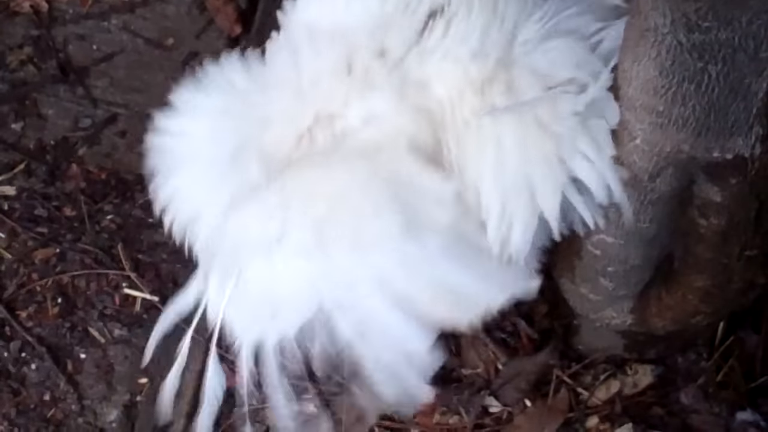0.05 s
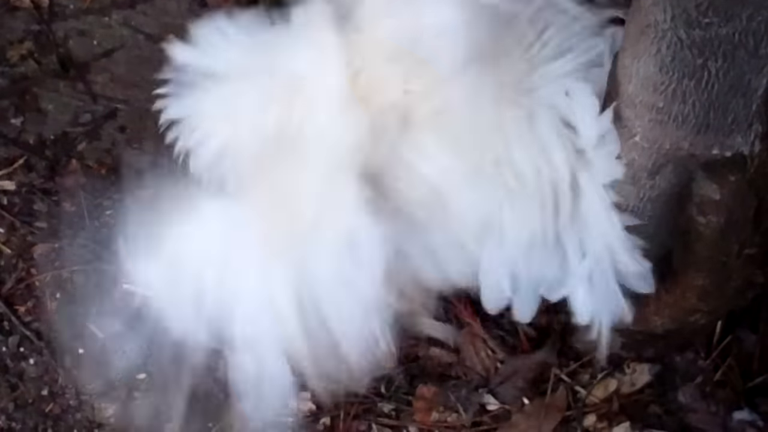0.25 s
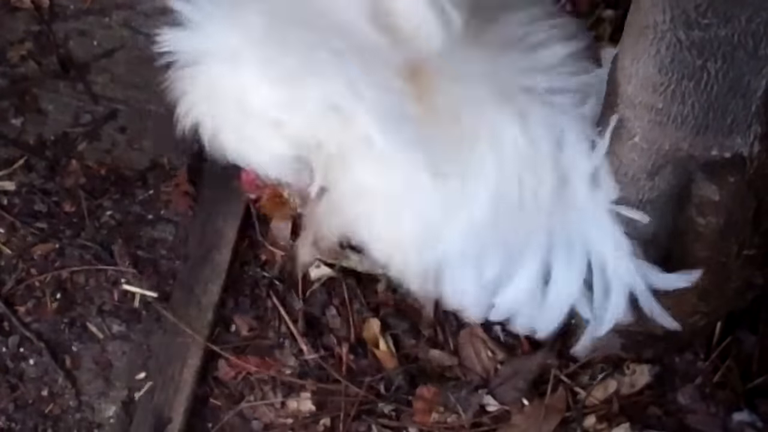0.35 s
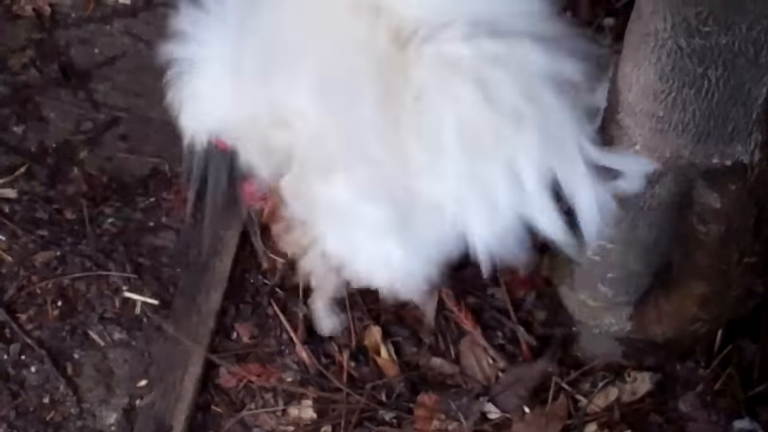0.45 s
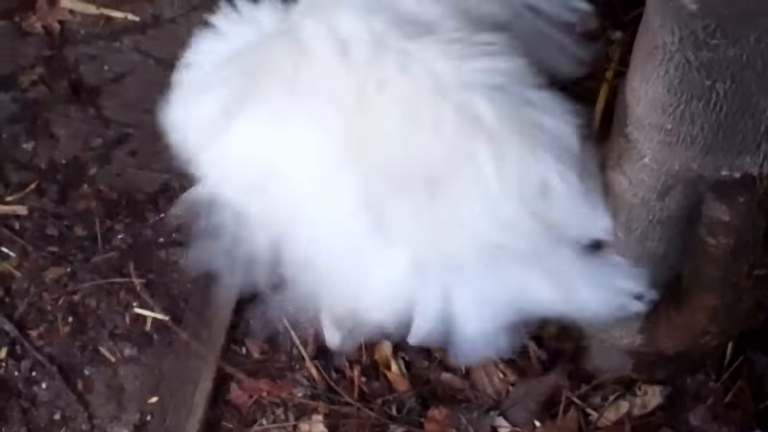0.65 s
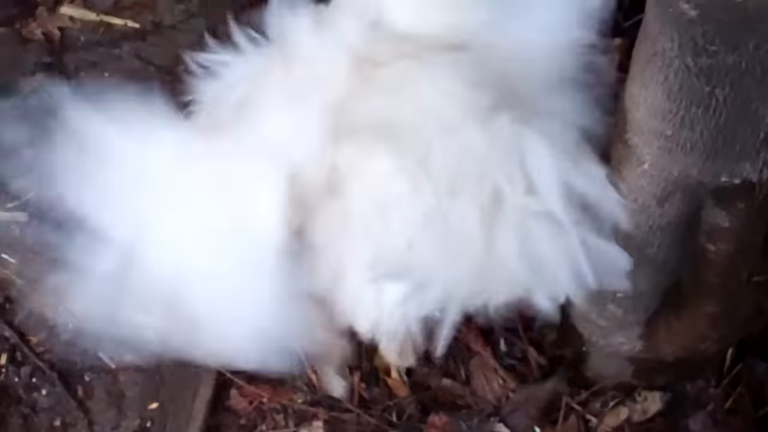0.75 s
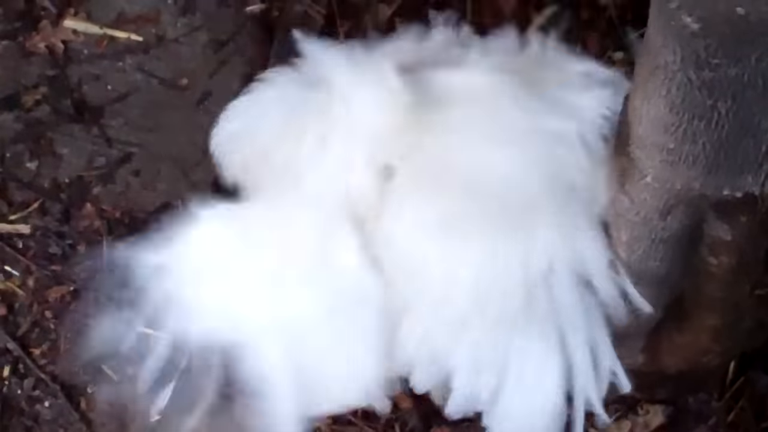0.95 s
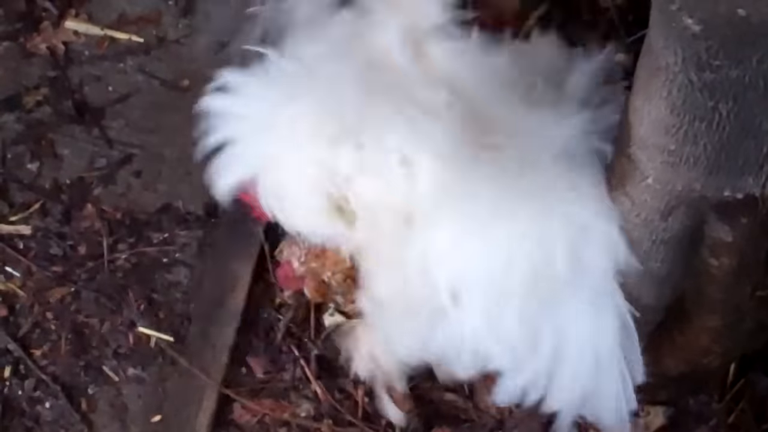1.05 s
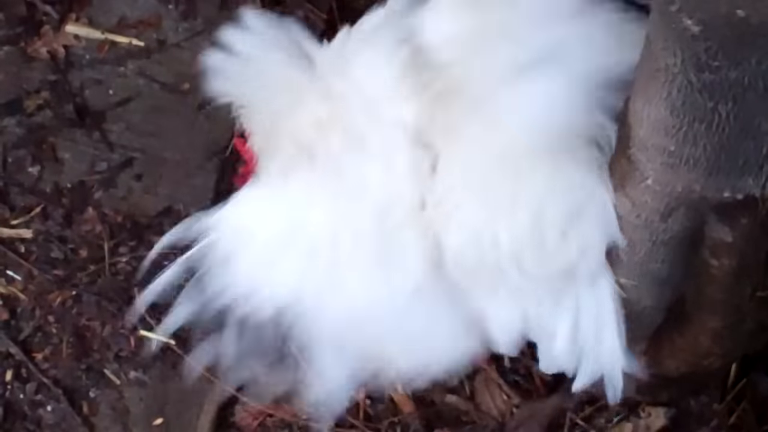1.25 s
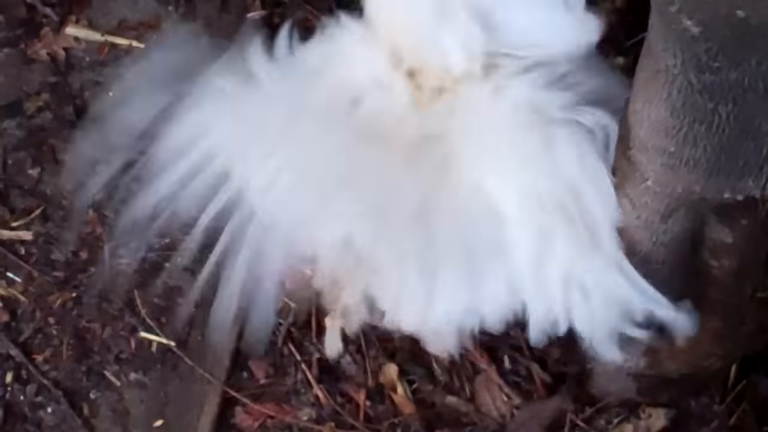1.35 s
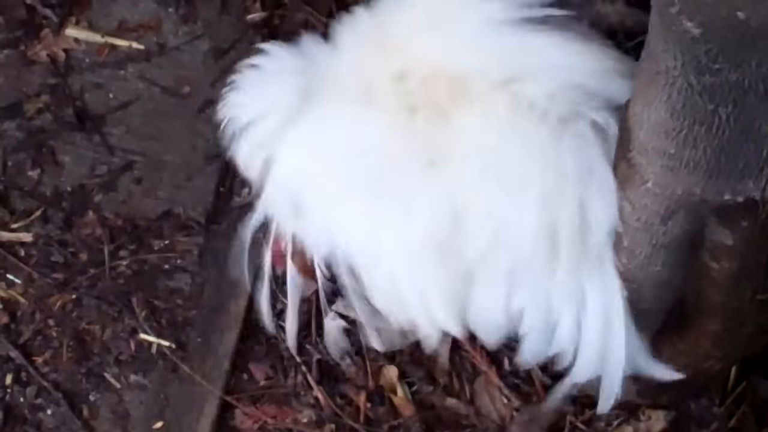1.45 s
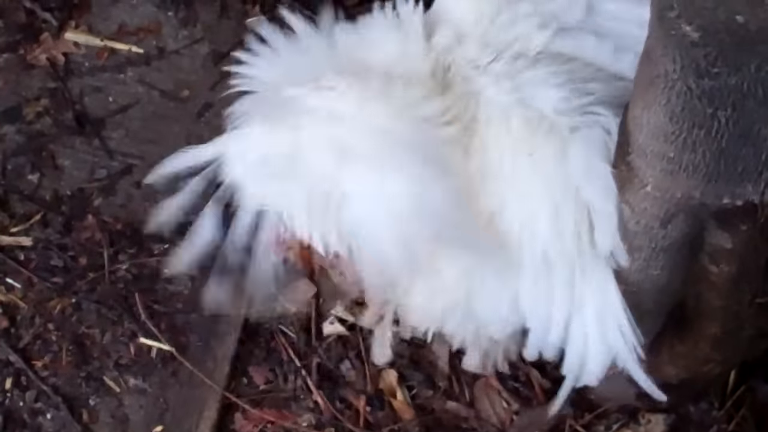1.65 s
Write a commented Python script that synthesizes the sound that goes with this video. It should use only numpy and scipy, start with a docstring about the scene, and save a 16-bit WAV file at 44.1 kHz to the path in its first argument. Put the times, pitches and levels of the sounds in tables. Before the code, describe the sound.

A hen flaps her wings in quick bursts, feathers rustling against leaves and bark.

```python
"""A quiet farmyard, microphone close to a hen beating her wings on leaf litter beside a tree trunk.
Each stroke pushes a soft whoosh of air; stiff feather tips scrape over bark and leaves,
and quills snap against them. Her plumage rustles in between, and a dull knock sounds at the very end.
The yard gives a faint echo; under it all lies a low hush with wide microphone hiss."""
import sys
import numpy as np
from scipy import signal
from scipy.fft import rfft, irfft, next_fast_len
from scipy.io import wavfile
from scipy.ndimage import map_coordinates

SR = 44100
rng = np.random.default_rng(int(sys.argv[2]) if len(sys.argv) > 2 else 0)


def put_to_file(sound):
    """Save the sound as 16-bit audio at rate SR, in the file named by the first command-line argument."""
    columns = np.atleast_2d(sound).T  # one column per channel
    safe = np.clip(columns, -1, 1)
    whole_steps = np.round(safe * 32767)
    wavfile.write(sys.argv[1], SR, whole_steps.astype(np.int16))


N = 74970

# spectra of the background, plumage, scraped bark, quill shaft, vane hiss and pushed air: f/Hz, level/dB
BACKGROUND_SPECTRUM = [(25, -5), (60, -4.5), (110, -0.5), (280, -3.5), (650, -0.5), (1100, 0.5),
                       (2000, -5.5), (5000, -8), (14000, -5)]
PLUMAGE_SPECTRUM = [(40, -15), (140, 6), (280, 6.5), (600, 3), (1400, -1), (3000, 1), (4500, 2), (7500, 1),
                    (10000, 1.5), (14000, 2.5)]
BARK_SPECTRUM = [(100, -37), (500, -6), (1500, -8.5), (3000, -1.5), (4400, -3.5), (6000, -1.5),
                 (7600, -4.5), (10000, 0.5), (13800, 0.5), (16000, -12)]
SHAFT_SPECTRUM = [(400, -28), (1500, -13), (2900, -5), (4000, -8.5), (5800, 1.5), (7600, -9)]
HISS_SPECTRUM = [(200, -24), (1000, -8.5), (2200, -4.5), (3200, -4), (4400, -3.5), (5800, -4.5),
                 (7500, -1.5), (10000, -2), (14000, 1)]
AIR_SPECTRUM = [(30, -22), (80, -15), (150, -3.5), (300, 2.5), (520, -2), (900, 0), (1400, -4), (2500, -5),
                (5000, -17), (14000, -30)]
# likeness of left and right in the background, low where microphone hiss rules: f/Hz, correlation/0-1
BACKGROUND_ALIKE = [(40, 0.83), (300, 0.31), (1100, 0.73), (2500, 0.041), (14000, .05)]
# likeness of left and right for the hen and her snaps: f/Hz, correlation/0-1
HEN_ALIKE = [(40, 1), (250, 0.99), (1000, 0.99), (3100, 1), (3700, 0.76), (7000, 0.16), (14000, 0.04)]
SNAP_ALIKE = [(3000, 0.84), (6000, 0.98), (14000, 1)]
# the hen's balance at the microphone: f/Hz, left over right/dB
HEN_BALANCE = [(2500, 0), (5500, 2.5), (8500, -2.3)]
# decay of the yard's echo: f/Hz, t60/s
ECHO_DECAY = [(200, 0.36), (2000, 0.25), (12000, 0.21)]
# modes of the knock: f/Hz, relative level/dB, t60/s
KNOCK_MODES = [(303, -4.5, 0.071), (510, -4.5, 0.09), (787, -0.5, 0.093), (1090, -3.5, 0.038)]
# rustle of the plumage: t/s, level/dB
RUSTLE_LEVELS = [(0, -56.5), (0.111, -60), (0.137, -47), (0.251, -41), (.31, -45.5), (.39, -43),
                 (.455, -46.5), (.5, -44.5), (.56, -42), (.66, -40.5), (.8, -43), (.93, -39), (1.07, -47),
                 (1.115, -48), (1.2, -45), (1.25, -51), (1.43, -49.5), (1.51, -46), (1.6, -48.5),
                 (1.67, -56.5)]
# feather tips on bark and leaves: start t/s, length/s, level/dB, treble tilt/dB per octave
TIP_SCRAPES = [(0.197, .001, -34, -2), (0.212, .012, -26, 2.5), (0.34, 0.019, -28.5, 5),
               (0.4804, 0.0018, -30, 0.5), (0.592, 0.016, -35, 0.5), (0.8333, 0.0048, -33.5, 1.5),
               (0.9132, 0.0058, -26.5, 1), (0.922, 0.0039, -25.5, 4), (0.927, 0.013, -34, 0),
               (1.005, 0.033, -34.5, 1.5), (1.042, 0.031, -40.5, 4), (1.1455, 0.022, -34.5, -1.5),
               (1.176, .002, -28.5, 4), (1.192, 0.024, -37.5, 1), (1.46, 0.014, -31.5, 1),
               (1.482, 0.017, -43, 3.5), (1.609, 0.021, -45.5, -1)]
# quill snaps: t/s, level/dB, crack f/Hz, shaft ring/dB, left over right/dB
QUILL_SNAPS = [(0.2148, -17, 11400, -5, 5), (.2259, -22, 10500, 1, -8), (0.23, -24, 10800, -2, 3),
               (.3438, -11, 8300, 2.5, 0), (.3466, -19.5, 12200, -5, 3), (.3596, -19.5, 11900, -7, -4),
               (0.4807, -22.5, 12700, -1, 1), (0.5944, -24.5, 9000, -11, 5), (.5968, -25.5, 10100, 4, -8),
               (.659, -37, 10100, -10, -4), (.7199, -28.5, 5100, -2, 5), (.8354, -20, 8800, -4.5, -2),
               (0.9228, -13, 11500, 26, -2), (.9245, -16, 12600, -8, -1), (1.0051, -28, 9000, 8, -13),
               (1.0083, -31.5, 6960, 10, 14), (1.034, -31.5, 11000, -2, -16),
               (1.178, -12.5, 11700, -8.5, -1), (1.1878, -32, 12000, -12, -6), (1.4612, -28.5, 10100, 2, 6),
               (1.463, -23, 10700, -11, -4), (1.4712, -22.5, 11100, -2, -2), (1.497, -36, 11000, -12, 4),
               (1.532, -42, 2900, -14, 2), (1.5403, -39.5, 10100, -12, -5), (1.568, -39, 9600, 3, 0)]
# wing strokes: fastest point t/s, half width/s, air level/dB, whoosh f/Hz, hollowness/dB, hiss level/dB
WING_STROKES = [(0.217, 0.0098, -48, 260, -3, -37.5), (0.262, 0.0087, -41, 1061, 12, -48),
                (0.323, 0.0064, -43.5, 283.6, 9, -56), (0.3568, 0.0043, -32, 732.7, 11, -55),
                (0.398, 0.011, -46, 673, 6, -61), (0.522, 0.016, -42, 290.6, 6, -41.5),
                (0.639, 0.0061, -35.5, 530.3, 11, -46), (0.689, 0.016, -46, 167.5, 3, -37.5),
                (0.7548, 0.0051, -32, 533, 10.5, -31.5), (0.874, 0.01, -34.5, 562, 5, -35),
                (0.918, 0.0087, -38.5, 620, 3.5, -43), (0.974, 0.01, -33, 421, 8, -29),
                (1.017, 0.0055, -36.5, 740, 9.5, -30), (1.096, 0.0062, -50, 595, -3, -41),
                (1.146, 0.011, -43, 98.4, 16.5, -49), (1.156, 0.0073, -34.5, 800, 0, -44),
                (1.342, 0.025, -47.5, 753, 3, -44.5)]

SOFT_TOP_HZ, TOP_HZ = 14400, 16800  # upper edge of the noises; band limit of the microphone
BACKGROUND_DB, ECHO_DB = -52, -16.5
KNOCK_S, KNOCK_DB, KNOCK_RISE_S = 1.694, -28, 0.0041
CRACKLE_PER_S, CRACKLE_DB, CRACKLE_SPREAD_DB = 140, -10.5, 5
SCRAPE_ATTACK_S, SCRAPE_RELEASE_S, TILT_FROM_HZ = 0.00079, 0.011, 1700
SNAP_RISE_S, SNAP_DECAY_S, SNAP_SPAN_S = 0.00006, 0.00025, 0.00067  # level is rms over the span
SNAP_RING_DB, SNAP_RING_S, SNAP_WIDTH_OCT, SNAP_TOP_DB = -20.5, 0.0035, 0.44, -30
STROKE_SKIRT, STROKE_FALL = 1.32, 0.78  # exponent of the swell; fall time over rise time
WHOOSH_WIDTH_OCT, FLUTTER_DB = 0.27, 2.5
THUMP_SHARE_PER_DB, THUMP_WAVER_RAD = -0.02, 0.53  # only negative hollowness gives a faint thump


def amp(db):
    """Decibels to gain."""
    return 10 ** (np.asarray(db) / 20)


def unit(x):
    """Scale to rms 1."""
    return x / np.sqrt(np.mean(x ** 2) + 1e-20)


def clock():
    """Time of every sample in seconds."""
    return np.arange(N) / SR


def along(points, hz):
    """Interpolate (f/Hz, value) points on a log-frequency axis."""
    f, v = np.transpose(points)
    return np.interp(np.log(hz + 1), np.log(f + 1), v)


def hump(hz, centre_hz, octaves):
    """A bell curve on a log-frequency axis."""
    return np.exp(-(np.log2((hz + 1) / centre_hz) / octaves) ** 2 / 2)


def wobble(rate):
    """A smooth random curve, rate knots a second."""
    return map_coordinates(rng.standard_normal(N // 4), [clock() * rate], mode="wrap")


def filtered(x, response):
    """Filter x by a gain given as a function of frequency."""
    size = next_fast_len(N + SR // 4)
    return irfft(rfft(x, size) * response(np.fft.rfftfreq(size, 1 / SR)), size)[..., :N]


def pan(db):
    """Left and right gains for a level difference."""
    return amp(np.array([[db], [-db]]) / 2)


def spread(pair, gain, alike):
    """Colour two unrelated signals and mix them as mid and side to a stereo pair of rms 1."""
    def response(hz):
        angle = np.arccos(np.clip(along(alike, hz), -1, 1)) / 2
        return gain(hz) * np.array([np.cos(angle), np.sin(angle)])
    mid, side = filtered(pair, response)
    return unit(np.array([mid + side, mid - side]))


def grains(spectrum, alike, grain_db, shade=np.zeros_like):
    """Stereo friction noise in sub-millisecond grains of random size; shade adds dB by frequency."""
    pair = rng.standard_normal((2, N)) * amp(grain_db * wobble(1800))
    return spread(pair, lambda hz: amp(along(spectrum, hz) + shade(hz)) * (hz < SOFT_TOP_HZ), alike)


def background():
    """Steady low background hush with wide microphone hiss."""
    return amp(BACKGROUND_DB) * grains(BACKGROUND_SPECTRUM, BACKGROUND_ALIKE, grain_db=0.0)


def echo(source):
    """Ground, trunk and yard answer briefly, the treble dying first."""
    hz, t, bands = signal.stft(rng.standard_normal((2, SR // 2)), SR, nperseg=256)
    decay = amp(-60 * t / along(ECHO_DECAY, hz)[:, None])
    tail = signal.istft(bands * decay, SR, nperseg=256)[1]
    tail = spread(tail, lambda hz: hz < SOFT_TOP_HZ, HEN_ALIKE) / np.sqrt(N)
    return amp(ECHO_DB) * signal.fftconvolve(source, tail, axes=1)[:, :N]


def knock():
    """One dull, hollow knock of a few low modes."""
    age = np.maximum(clock() - KNOCK_S, 0)
    ring = sum(amp(db - 60 * age / t60) * np.sin(2 * np.pi * hz * age) for hz, db, t60 in KNOCK_MODES)
    return amp(KNOCK_DB) * ring * (1 - np.exp(-age / KNOCK_RISE_S))


def plumage_rustle():
    """Body feathers keep stirring in small clumps, and the dry litter ticks under them."""
    level_db = np.interp(clock(), *np.transpose(RUSTLE_LEVELS)) + 0.5 * wobble(60.15) + 1.6 * wobble(300)
    starts = (rng.random(N) < CRACKLE_PER_S / SR) * amp(CRACKLE_SPREAD_DB * rng.standard_normal(N))
    decays = signal.lfilter([1], [1, -np.exp(-1 / (SNAP_DECAY_S * SR))], starts)
    ticks = decays * rng.standard_normal((2, N))
    litter = spread(ticks, lambda hz: amp(along(BARK_SPECTRUM, hz)) * (hz < SOFT_TOP_HZ), SNAP_ALIKE)
    feathers = grains(PLUMAGE_SPECTRUM, HEN_ALIKE, grain_db=2.0)
    return amp(level_db) * (feathers + amp(CRACKLE_DB) * litter)


def feather_scrapes():
    """Feather tips on bark and leaves: each scrape swells in quickly, rasps and dies away."""
    t, out = clock(), np.zeros((2, N))
    for start, length, db, tilt_db in TIP_SCRAPES:
        fade_in = np.exp(-np.maximum(start - t, 0) / SCRAPE_ATTACK_S)
        fade_out = np.exp(-np.maximum(t - start - length, 0) / SCRAPE_RELEASE_S)
        tilt = lambda hz: tilt_db * np.log2(1 + hz / TILT_FROM_HZ)
        out += amp(db) * fade_in * fade_out * grains(BARK_SPECTRUM, HEN_ALIKE, grain_db=2.5, shade=tilt)
    return out


def quill_snaps():
    """A quill slips and strikes: a tiny bright crack, fuller the more its hollow shaft rings."""
    t, out = clock(), np.zeros((2, N))
    for start, db, crack_hz, shaft_db, pan_db in QUILL_SNAPS:
        age = np.maximum(t - start, 0)
        rise = 1 - np.exp(-age / SNAP_RISE_S)
        fall = np.exp(-age / SNAP_DECAY_S) + amp(SNAP_RING_DB) * np.exp(-age / SNAP_RING_S)
        burst = rise * fall * rng.standard_normal((2, N))

        def colour(hz):
            crack = hump(hz, crack_hz, SNAP_WIDTH_OCT)
            shaft = amp(shaft_db + along(SHAFT_SPECTRUM, hz))
            return (crack + shaft) * amp(SNAP_TOP_DB * (hz > SOFT_TOP_HZ))
        out += amp(db) * pan(pan_db) * spread(burst, colour, SNAP_ALIKE)
    return out * np.sqrt(SNAP_SPAN_S * SR / N)


def wing_strokes():
    """Air and vane hiss swell and fade with wing speed; the cupped wing gives a hollow pitch."""
    t, air, hiss_gain = clock(), np.zeros((2, N)), np.zeros(N)
    for peak_s, rise_s, air_db, pitch_hz, hollow_db, hiss_db in WING_STROKES:
        width = np.where(t < peak_s, rise_s, rise_s * STROKE_FALL)
        speed = np.exp(-np.abs((t - peak_s) / width) ** STROKE_SKIRT / 2)
        resonance = lambda hz: hollow_db * hump(hz, pitch_hz, WHOOSH_WIDTH_OCT)
        whoosh = grains(AIR_SPECTRUM, HEN_ALIKE, grain_db=1.0, shade=resonance)
        phase = 2 * np.pi * (pitch_hz * t + rng.random())
        thump = unit(np.sin(phase + THUMP_WAVER_RAD * wobble(pitch_hz / 4)))
        share = np.clip(THUMP_SHARE_PER_DB * hollow_db, 0, 1)
        air += amp(air_db) * speed * (np.sqrt(1 - share) * whoosh + np.sqrt(share) * thump)
        hiss_gain += amp(hiss_db) * speed
    vane_flutter = amp(FLUTTER_DB * wobble(220))
    return vane_flutter * (air + hiss_gain * grains(HISS_SPECTRUM, HEN_ALIKE, grain_db=1.0))


def scene():
    """The hen and the knock close to the microphone, their echo and the background."""
    close = wing_strokes() + feather_scrapes() + quill_snaps() + plumage_rustle() + knock()
    close = filtered(close, lambda hz: amp(np.outer([1, -1], along(HEN_BALANCE, hz)) / 2))
    return close + echo(close) + background()


def record(dry):
    """The microphone passes nothing above its band limit."""
    return filtered(dry, lambda hz: hz < TOP_HZ)


dry = scene()
out = record(dry)
put_to_file(out)
```